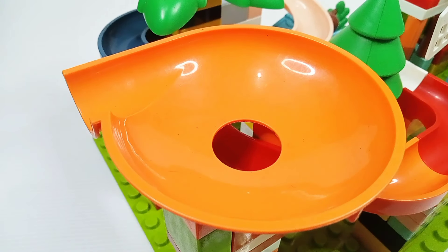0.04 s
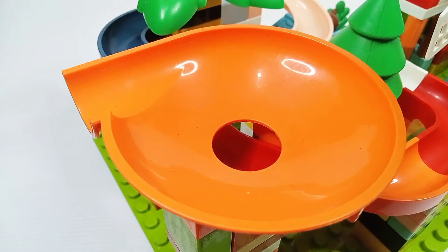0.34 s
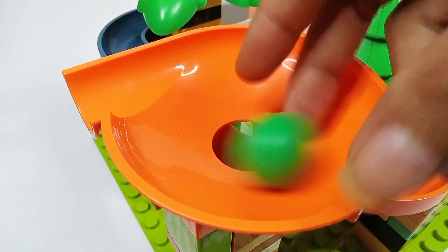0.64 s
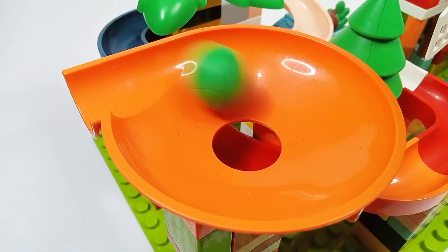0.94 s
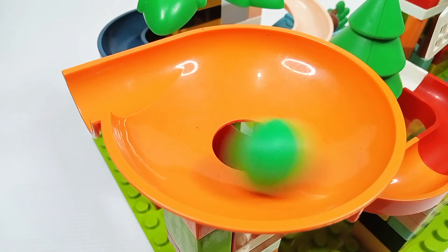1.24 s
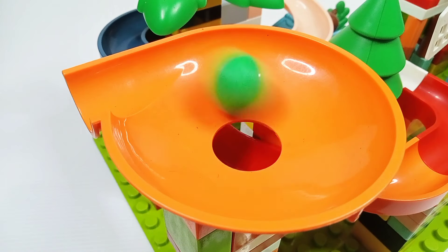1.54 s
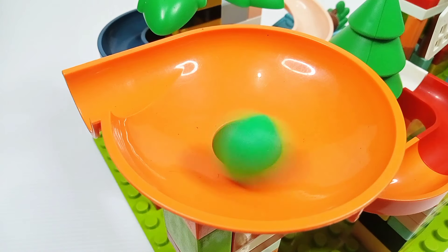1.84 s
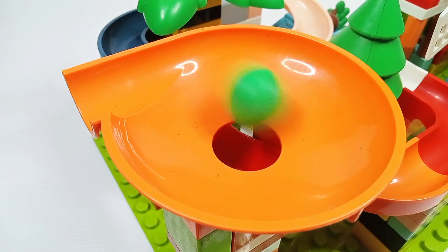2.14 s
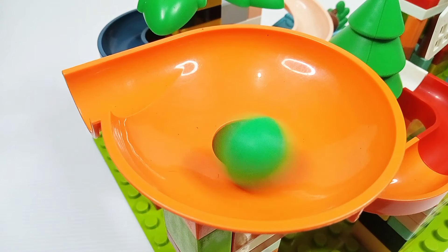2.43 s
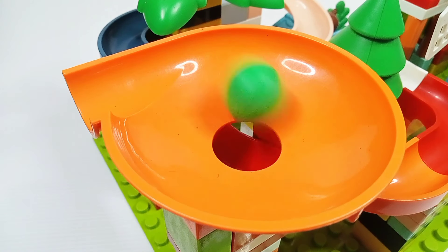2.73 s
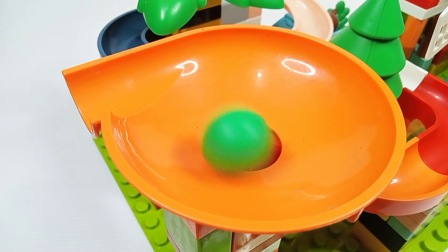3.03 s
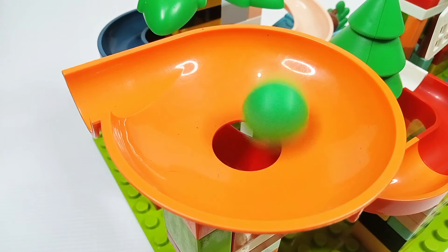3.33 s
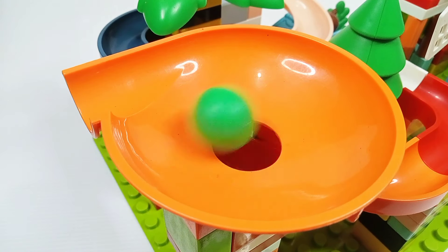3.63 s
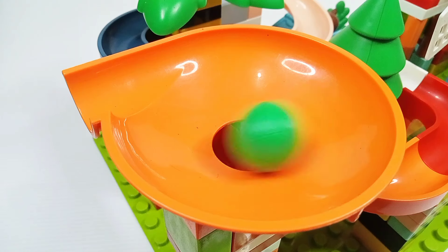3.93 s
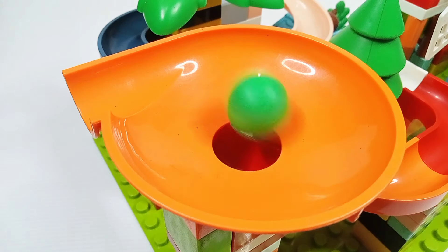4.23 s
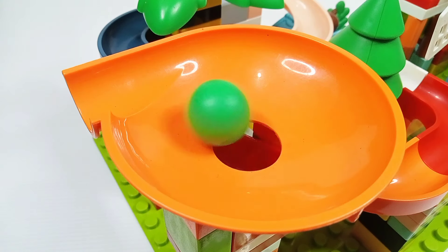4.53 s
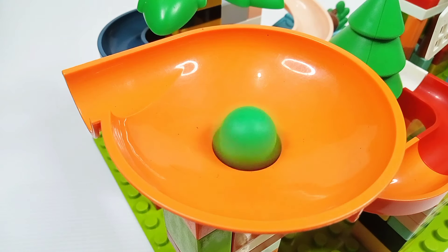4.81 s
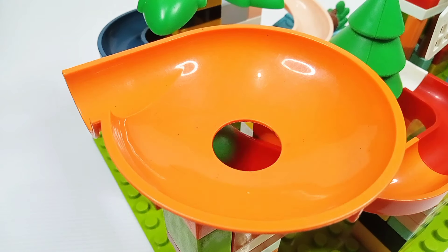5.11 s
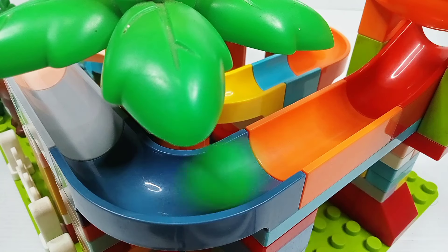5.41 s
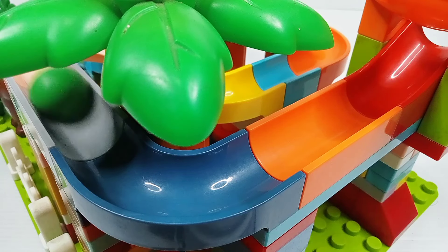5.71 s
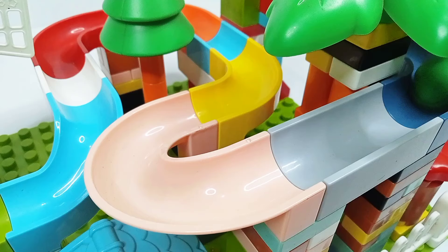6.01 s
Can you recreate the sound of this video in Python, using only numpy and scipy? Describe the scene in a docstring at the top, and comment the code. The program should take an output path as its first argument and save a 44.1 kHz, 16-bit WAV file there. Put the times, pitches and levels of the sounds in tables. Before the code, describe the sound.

Heard close up in a small room, a marble clacks into a plastic bowl and rolls in circles, its hollow drumming rising and fading in repeated waves with scattered clicks. The circling ends in a bright, fast chatter at the hole. The marble falls onto a slide with quick bounces, then clatters through plastic chutes, the tone changing from piece to piece, over a faint low rumble from the block tower.

```python
"""A marble drops into the plastic funnel of a block track, close by in a small, hard room.
It circles the bowl in long ellipses, drumming on the plastic, swelling on each fast pass and
ticking over the rim of the hole. Then it rattles round the hole, falls through, bounces on the
slide and knocks along the joints of the chutes. All the way down, the tower rumbles under it."""
import sys
import numpy as np
from scipy import signal
from scipy.fft import rfft, irfft, next_fast_len
from scipy.io import wavfile
from scipy.ndimage import uniform_filter1d

SR = 44100
rng = np.random.default_rng(int(sys.argv[2]) if len(sys.argv) > 2 else 0)


def transcribe(signal):
    """Save signal, clipped to [-1, 1], as a 16-bit WAV file at the path in sys.argv[1]."""
    frames = np.atleast_2d(signal).T
    limited = np.clip(frames, -1, 1)
    pcm = np.round(limited * 32767).astype(np.int16)
    wavfile.write(sys.argv[1], SR, pcm)


N = 271656
TIME = np.arange(N) / SR


# fast passes, the run-in and then two an orbit: t/s, length/s, roll level/dB, grit level/dB
PASSES = [(0.678, 0.15, -41.5, -31.5), (0.806, 0.021, -33.5, -33), (1.037, 0.16, -40.5, -49.5),
          (1.35, 0.15, -41, -51), (1.62, 0.16, -43.5, -49), (1.982, 0.069, -40, -53.5),
          (2.236, 0.13, -49, -58.5), (2.547, 0.1, -46.5, -55.5), (2.881, 0.058, -45, -54),
          (3.13, 0.098, -45.5, -55.5), (3.48, 0.077, -46, -57.5), (3.785, 0.037, -43.5, -52),
          (4.084, 0.051, -44.5, -53), (4.429, 0.04, -49, -55.5), (4.735, 0.19, -39, -44.5)]
def passes():
    """Roll and grit gains in the bowl, and the bare swing: each pass swells, holds and fades."""
    land_s, through_s = 0.68, 5.1
    swell_db_per_s, fade_db_per_s = 147.5, 106.5  # base slopes: towards the hole, away from it
    steepen = 1 + 0.33 * np.maximum(TIME - land_s, 0)  # the orbit narrows
    start, length, roll_db, grit_db = np.transpose(PASSES)[:, :, None]
    before, after = np.maximum(start - TIME, 0), np.maximum(TIME - start - length, 0)
    swing = amp(-(swell_db_per_s * before + fade_db_per_s * after) * steepen)
    inside = (TIME > land_s) & (TIME < through_s)
    roll, grit = (inside * np.max(swing * amp(db), axis=0) for db in (roll_db, grit_db))
    return roll, grit, np.where(inside & (TIME < start[-1]), swing.max(axis=0), 1)


# the ring of the bowl: f/Hz, width/Hz, level/dB
BOWL_MODES = [(573, 27, 1.5), (690, 8.4, 1), (863, 29, 2), (961.5, 76, -2), (1098, 34, -1),
              (1246, 85, -0.5), (1408, 51, 3.5), (1551, 56, 4), (1680, 64, 1), (1785, 110, -7),
              (1955, 28, 2.5), (2095, 35, -2.5), (2587, 34, 0.5), (2590, 82, -7), (2700, 54, -7),
              (2990, 95, -6), (3190, 56, 1), (3465, 38, -10), (3544, 29, -4.5), (4070, 33, 0),
              (4916, 190, -6), (6260, 390, -7), (8410, 1100, -6.5), (9100, 710, -10), (11250, 350, -30)]
def bowl_ring(force):
    """The bowl rings under the circling marble."""
    return travelling(force, BOWL_MODES, broad_db=-10, shift_rate=14, shift_db=8.5)


# EQ of the roll in the bowl: f/Hz, level/dB
BOWL_EQ = [(150, -37), (300, -4), (550, -1.5), (900, 1), (1650, -8), (2100, -22.5), (3200, -23),
           (6000, -44.5)]
def bowl_roll(roll, grit):
    """The marble drums over the fine bumps of the bowl."""
    return rolling(amp(-0.8) * roll, amp(1) * grit, bowl_ring, BOWL_EQ,
                   rate=600, grit_rate=2000, spread_db=0.5, flutter_db=3)


# hard hits on the bowl: t/s, clack level/dB, knock level/dB, tick level/dB, spot f/Hz
BOWL_HITS = [(0.6757, -19, -24.5, -39, 3130), (0.679, -22.5, -40, -22, 4015),
             (1.4376, -35.5, -38, -62, 1500), (1.447, -32.5, -39, -45.5, 1450),
             (1.455, -32, -27.5, -60, 1050), (1.7512, -26, -29, -62, 3300),
             (2.2255, -54.5, -47.5, -72, 1650), (2.321, -55, -51, -67.5, 1380),
             (2.661, -55.5, -48, -72, 1580), (2.8254, -54, -55, -77, 1650), (2.957, -49, -46, -70, 824),
             (3.1702, -46, -35.5, -52, 857), (3.475, -47.5, -52, -57, 855), (3.5315, -37.5, -44, -50, 1670),
             (3.682, -58, -48.5, -75, 880), (4.0262, -49.5, -52, -57, 1680), (4.6945, -41, -45, -57, 4050),
             (4.7026, -38.5, -40.5, -52.5, 3030), (4.743, -28, -33.5, -35, 3210),
             (4.8476, -15, -30, -26, 2660), (4.853, -21, -23, -29, 3120), (4.8634, -24, -27, -42, 3200),
             (4.989, -16, -25.5, -30.5, 2770), (5.0047, -17.5, -27, -30, 2634),
             (5.042, -14, -25, -42, 3190), (5.0646, -11.5, -24.5, -26.5, 2920)]
def bowl_hits():
    """The marble strikes the bowl as it lands, circles and chatters round the hole."""
    return blows(BOWL_HITS, shell(BOWL_MODES, broad_db=-11), rise_s=0.00047, contact_t60=0.014,
                 soft_hz=6000, buzz_t60=0.059, buzz_db=-15.5, spot_width_hz=86, spot_db=11,
                 lowest_hz=580, level_db=0, room_db=-6)


# glancing rubs: t/s, clack level/dB, knock level/dB, tick level/dB, spot f/Hz
BOWL_SCUFFS = [(1.026, -37, -40.5, -53.5, 1690), (1.106, -64, -35, -75, 1350),
               (1.167, -36.5, -35.5, -73, 2990), (1.362, -37, -39.5, -50, 1380),
               (1.713, -60, -36.5, -52.5, 1676), (1.995, -46.5, -33.5, -54.5, 1690),
               (2.561, -49.5, -45, -58, 860), (2.869, -70, -43, -66, 1523),
               (3.435, -69, -49.5, -74.5, 1710), (3.79, -40.5, -44.5, -51, 3320),
               (4.104, -57, -40.5, -60, 1683), (4.433, -47.5, -48, -58.5, 870),
               (4.7335, -32.5, -39.5, -41, 3020), (4.928, -16, -26, -26, 3460),
               (4.938, -18, -21, -35, 3390)]
def bowl_scuffs():
    """The marble grazes the bowl and the rim of the hole: long contacts with a soft attack."""
    return blows(BOWL_SCUFFS, shell(BOWL_MODES, broad_db=-11), rise_s=0.01, contact_t60=0.036,
                 soft_hz=4500, buzz_t60=0.041, buzz_db=-33, spot_width_hz=53, spot_db=13.5,
                 lowest_hz=490, level_db=-0.5, room_db=-9)


# envelope of the whirl: t/s, level/dB
WHIRL_ENVELOPE = [(4.84, -14), (4.868, -22), (4.986, -16), (5.02, -7.5), (5.11, -25)]
# its bright EQ: f/Hz, level/dB
WHIRL_EQ = [(150, -8.5), (400, -7), (1200, -2.5), (3000, 6.5), (5000, 0.5), (6500, -13.5), (9500, -11.5),
            (16000, -37)]
def whirl():
    """The marble whirls inside the hole; dense collisions ring the bowl."""
    return envelope(WHIRL_ENVELOPE) * coloured(bowl_ring(bumps(rate=2500, spread_db=4)), WHIRL_EQ)


# the landing on the slide: t/s, clack level/dB, knock level/dB, tick level/dB, spot f/Hz
DROP = (5.1245, -15.5, -22, -25.5, 3898)
def drop():
    """The marble falls onto the slide and rebounds twice, each time sooner and weaker."""
    first_flight_s, shrink, loss_db = 0.053, 0.904, 1.7
    start, clack, knock, tick, hz = DROP
    bounce = np.arange(3)
    flights = first_flight_s * shrink ** bounce
    times = start + np.cumsum(flights) - flights
    hits = [(s, clack - db, knock - db, tick - db, hz) for s, db in zip(times, loss_db * bounce)]
    return blows(hits, struck_chute, rise_s=0.0001, contact_t60=0.0018,
                 soft_hz=10000, buzz_t60=0.037, buzz_db=-15, spot_width_hz=990, spot_db=7.5,
                 lowest_hz=554, level_db=2.5, room_db=-9)


# hits down the chutes: t/s, clack level/dB, knock level/dB, tick level/dB, spot f/Hz
CHUTE_HITS = [(5.112, -47, -29, -62, 3290), (5.3317, -18.5, -19, -36.5, 2840),
              (5.3565, -31, -31.5, -60, 800), (5.4325, -24.5, -32, -52, 2730), (5.447, -31, -23, -55, 1860),
              (5.4919, -26, -18, -40, 1880), (5.5125, -30.5, -27, -58, 1870), (5.5295, -34, -27, -58, 1960),
              (5.621, -49, -30, -52, 1860), (5.691, -44, -29.5, -67, 1870), (5.7244, -30, -23.5, -59, 2170),
              (5.733, -32.5, -27, -54, 2260), (5.8364, -32.5, -31, -55, 2170),
              (5.859, -39.5, -39, -46.5, 4070), (5.9384, -32, -32, -57, 2180),
              (6.04, -43, -36.5, -44.5, 880), (6.063, -30, -24, -35, 2030), (6.109, -41, -29.5, -47, 1970),
              (6.153, -39, -26, -46, 2280)]
def chute_hits():
    """The marble knocks on joints and walls, and the loose joints buzz."""
    return blows(CHUTE_HITS, struck_chute, rise_s=0.00016, contact_t60=0.0062,
                 soft_hz=8800, buzz_t60=0.078, buzz_db=-8, spot_width_hz=310, spot_db=11,
                 lowest_hz=393, level_db=0.5, room_db=-8)


# the ring all chute pieces share: f/Hz, width/Hz, level/dB
CHUTE_MODES = [(410, 54, -0.5), (566, 26, -16), (773, 20, -2), (1162, 18, -2), (1380, 240, -10.5),
               (1860, 830, -1), (2300, 27, 0), (2730, 35, 5.5), (3350, 50, -29), (4620, 120, -27),
               (7350, 1000, -7), (9350, 1400, -9.5)]
def struck_chute(f):
    """Response of a chute to a hard blow, which also rings the stiff side walls."""
    side_walls = (4370, 2400, -30)
    return shell([*CHUTE_MODES, side_walls], broad_db=-5)(f)


# chute pieces as they are crossed: entry t/s, ring f/Hz, roll level/dB, grit level/dB
PIECES = [(5.12, 1350, -33, -21), (5.33, 2730, -35.5, -41), (5.48, 1780, -31.5, -29.5),
          (5.6, 2070, -36, -42), (5.75, 1330, -38.5, -38.5), (6.04, 1520, -30.5, -39)]
# EQ of the roll in the chutes: f/Hz, level/dB
CHUTE_EQ = [(150, -27), (350, -7), (900, 2), (2000, -10.5), (3200, -16.5), (6000, -36)]
def chute_roll():
    """Each joint stirs the marble up, then it settles; each piece adds its own note to the roll."""
    settle_db_per_s = 13
    entries, notes_hz, roll_db, grit_db = np.transpose(PIECES)
    piece = np.maximum(np.searchsorted(entries, TIME, side="right") - 1, 0)
    age = TIME - entries[piece]
    settle = (age >= 0) * amp(-settle_db_per_s * np.maximum(age, 0))
    roll, grit = (uniform_filter1d(settle * amp(db[piece]), size=600) for db in (roll_db, grit_db))

    def ring(force):
        notes = sum(filtered(force * (piece == k), lambda f: resonance(f, hz, width_hz=120))
                    for k, hz in enumerate(notes_hz))
        shared = travelling(force, CHUTE_MODES, broad_db=0, shift_rate=12, shift_db=18.5)
        return amp(8.5) * notes + shared

    return rolling(amp(-2) * roll, amp(-11) * grit, ring, CHUTE_EQ,
                   rate=450, grit_rate=1200, spread_db=2.5, flutter_db=0.5)


# EQ of the gritty top of every roll: f/Hz, level/dB
GRIT_EQ = [(800, -26.5), (1800, 9), (2800, 12), (4200, 8.5), (6000, -0.5), (9500, -5), (12000, -6.5),
           (16000, -10)]
def rolling(roll, grit, ring, eq, rate, grit_rate, spread_db, flutter_db):
    """Surface bumps drum on the part under a fluttering pressure; denser specks add grit."""
    pressure = amp(flutter_db * wobble(60))
    drum = coloured(ring(pressure * bumps(rate, spread_db)), eq)
    specks = coloured(ring(pressure * bumps(grit_rate, spread_db)), GRIT_EQ)
    return roll * drum + grit * specks


def blows(hits, body, rise_s, contact_t60, soft_hz, buzz_t60, buzz_db, spot_width_hz, spot_db,
          lowest_hz, level_db, room_db):
    """A burst of contact and a short buzz of the loose blocks ring the part, then the room."""
    out, t = np.zeros(N + SR), np.arange(SR // 6) / SR
    size = next_fast_len(2 * len(t))
    f = np.fft.rfftfreq(size, 1 / SR)
    response = body(f) / (1 + 1j * f / soft_hz)  # the plastic yields and dulls the top
    for s, clack_db, knock_db, tick_db, spot_hz in hits:
        attack = 1 - np.exp(-t / rise_s)
        decay = amp(-60 * t / contact_t60) + amp(buzz_db - 60 * t / buzz_t60)
        force = attack * decay * rng.choice([-1, 1], len(t))
        spot = 1 + amp(spot_db) * resonance(f, spot_hz, spot_width_hz)  # the spot favours one mode
        echo_s = rng.uniform(0.0002895, 0.001276)  # the wave returns from the nearest edge
        edge = 1 + 0.46 * np.exp(-2j * np.pi * f * echo_s)
        ring = irfft(rfft(force, size) * response * spot * edge, size)[:len(t)]
        knock = amp(knock_db) * band(ring, lowest_hz, 2140, order=4)
        clack = amp(clack_db) * band(ring, 2096, 5075, order=3)
        tick = amp(tick_db) * band(ring, 5290, 15000, order=3)
        hit = amp(level_db) * (knock - clack + tick)
        heard = amp(room_db) * signal.fftconvolve(hit, room_tail())
        heard[:len(t)] += hit
        out[round(s * SR):][:len(heard)] += heard
    return out[:N]


def bumps(rate, spread_db):
    """Force of tiny random collisions with the surface, rate a second."""
    kicks = (rng.random(N) < rate / SR) * rng.choice([-1, 1], N)
    return kicks * amp(spread_db * np.clip(rng.standard_normal(N), -2, 2))


def travelling(force, modes, broad_db, shift_rate, shift_db):
    """A moving contact crosses each mode's nodes and bellies, so their strengths keep shifting."""
    out = amp(broad_db) * force
    for hz, width, db in modes:
        b, a = signal.iirpeak(hz, hz / width, fs=SR)
        strength = amp(db + shift_db * np.tanh(wobble(shift_rate)))
        out += signal.lfilter(b, a, force * strength)
    return out


def shell(modes, broad_db):
    """Response of a plastic part: clear resonances over a broad bed of damped ones."""
    return lambda f: amp(broad_db) + sum(amp(db) * resonance(f, hz, width) for hz, width, db in modes)


# slow envelope of the rumble: t/s, level/dB
TOWER_ENVELOPE = [(0.62, -57), (1.2, -48), (2.8, -56.5), (3.15, -51.5), (4.4, -55.5), (5.05, -52),
                  (6.16, -46)]
# boom of the tower on its base plate: f/Hz, width/Hz, level/dB
TOWER_MODES = [(57.2, 16, 2.5), (103.1, 5.3, 8), (164, 27, -11.5)]
# EQ of the rumble: f/Hz, level/dB
TOWER_EQ = [(15, -46.5), (25, -43), (42, -10), (71, -5), (103, 0), (178, 2.5), (350, -8.5), (460, -53),
            (770, -120)]
def tower_rumble(swing):
    """The block tower shakes under the moving marble, a little harder on each pass."""
    follow = 0.16  # share of the swing in dB
    shaking = filtered(rng.standard_normal(N), shell(TOWER_MODES, broad_db=4))
    return envelope(TOWER_ENVELOPE) * swing ** follow * coloured(shaking, TOWER_EQ)


# reverb decay of the room: f/Hz, t60/s
ROOM_DECAY = [(200, 0.97), (800, 0.37), (3000, 0.52), (8000, 0.46), (15000, 0.4)]
def room_tail():
    """Diffuse reflections of energy 1 that build up quickly and linger longest in the bass."""
    hz, t, noise = signal.stft(rng.standard_normal(SR * 6 // 10), SR, nperseg=256)
    build = 1 - np.exp(-(t / 0.0064) ** 2)
    decay = amp(-60 * t / along(ROOM_DECAY, hz)[:, None])
    tail = signal.istft(noise * build * decay, SR, nperseg=256)[1]
    return tail / np.linalg.norm(tail)


def in_room(x, wet_db):
    """A running sound plus its reverb."""
    return x + amp(wet_db) * signal.fftconvolve(x, room_tail())[:N]


# EQ of the room tone: f/Hz, level/dB
AIR_EQ = [(30, -11), (100, 5.5), (300, 3), (1000, -5), (3000, -12), (8000, -23.5), (16000, -25)]
def room_tone():
    """The room's own air, a steady dark noise."""
    return coloured(rng.standard_normal(N), AIR_EQ)


def amp(db):
    """Decibels to gain."""
    return 10 ** (np.asarray(db) / 20)


def along(points, hz):
    """A curve through (Hz, value) points on a log axis."""
    f, value = np.transpose(points)
    return np.interp(np.log(hz + 1), np.log(f + 1), value)


def envelope(points):
    """Gain through (s, dB) points, closed outside their span."""
    s, db = np.transpose(points)
    gate = uniform_filter1d(1. * ((TIME >= s[0]) & (TIME <= s[-1])), size=300)
    return gate * amp(np.interp(TIME, s, db))


def wobble(rate):
    """A random curve, rate knots a second."""
    knots = rng.standard_normal(N // 100)
    return np.interp(TIME * rate, np.arange(len(knots)), knots)


def resonance(f, hz, width_hz):
    """Response of one damped mode, 1 at its centre."""
    return 1j * f * width_hz / (hz * hz - f * f + 1j * f * width_hz)


def filtered(x, response):
    """x through a complex frequency response."""
    size = next_fast_len(len(x) + SR // 10)
    return irfft(rfft(x, size) * response(np.fft.rfftfreq(size, 1 / SR)), size)[:len(x)]


def coloured(x, eq):
    """x through an EQ curve, at rms 1."""
    y = filtered(x, lambda hz: amp(along(eq, hz)))
    return y / np.sqrt(np.mean(y ** 2) + 1e-20)


def band(x, lo_hz, hi_hz, order):
    """One band of a blow, at rms 1 over its first 10 ms."""
    y = signal.sosfilt(signal.butter(order, [lo_hz, hi_hz], "band", fs=SR, output="sos"), x)
    return y / np.sqrt(np.mean(y[:SR // 100] ** 2))


def scene():
    """Mono mix: bowl, then chutes, over the rumble and the room tone."""
    roll, grit, swing = passes()
    bowl = bowl_hits() + bowl_scuffs()
    bowl += in_room(bowl_roll(roll, grit) + amp(-7.5) * whirl(), wet_db=-8)
    chutes = drop() + chute_hits() + in_room(chute_roll(), wet_db=-1)
    background = amp(-0.5) * tower_rumble(swing) + amp(-67) * room_tone()
    return (bowl + chutes + background)[None]


def record(dry):
    """A gate opens just before the marble lands; a soft clip and a steep low-pass follow."""
    open_s, top_hz = 0.6, 16000
    opened = np.where(TIME < open_s, amp(-48), 1) * dry[0]
    rounded = opened / (1 + np.abs(opened) ** 6) ** (1 / 6)
    return filtered(rounded, lambda hz: 1 / (1 + (hz / top_hz) ** 120))[None]


dry = scene()
out = record(dry)
transcribe(out)
```